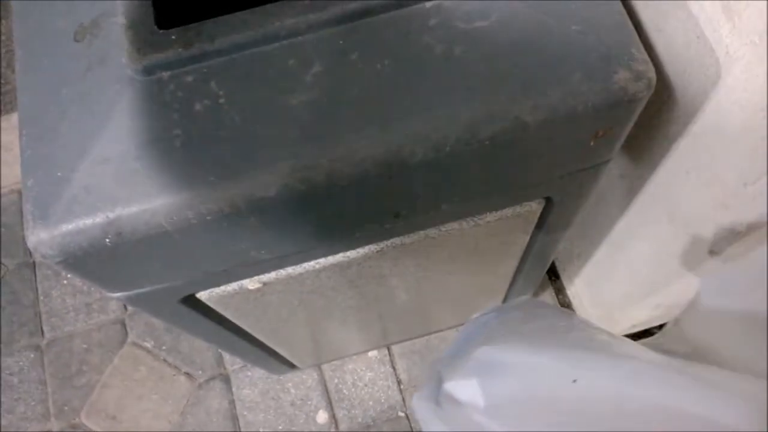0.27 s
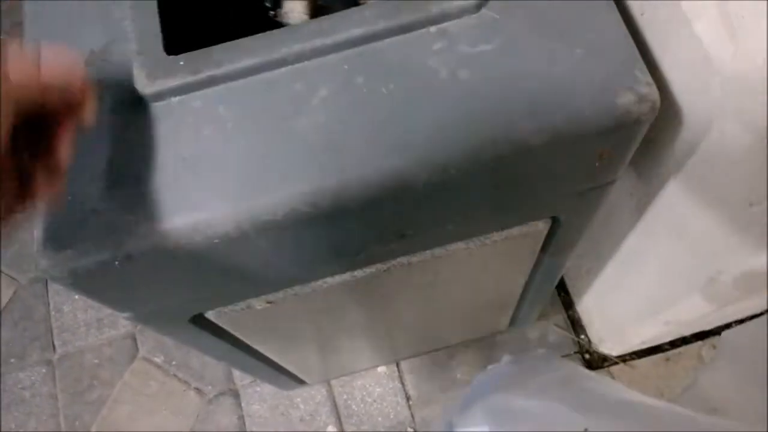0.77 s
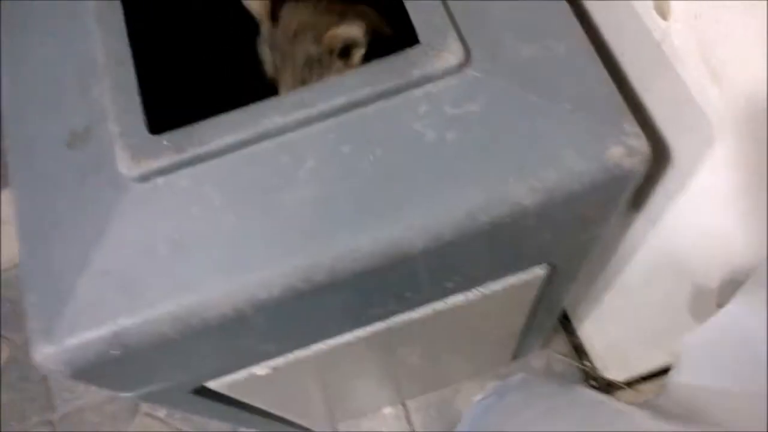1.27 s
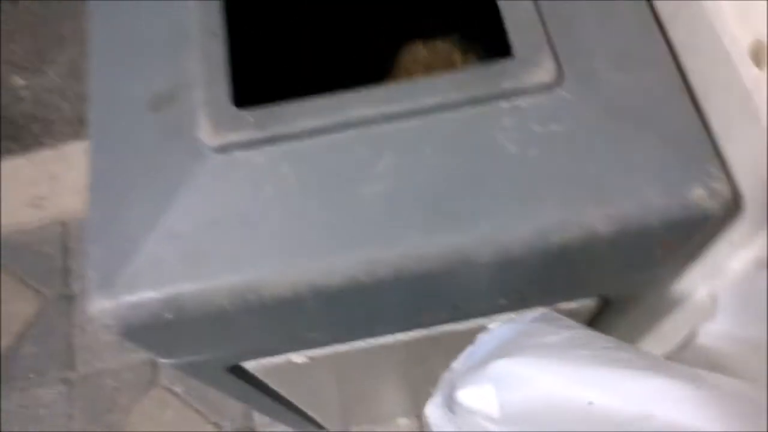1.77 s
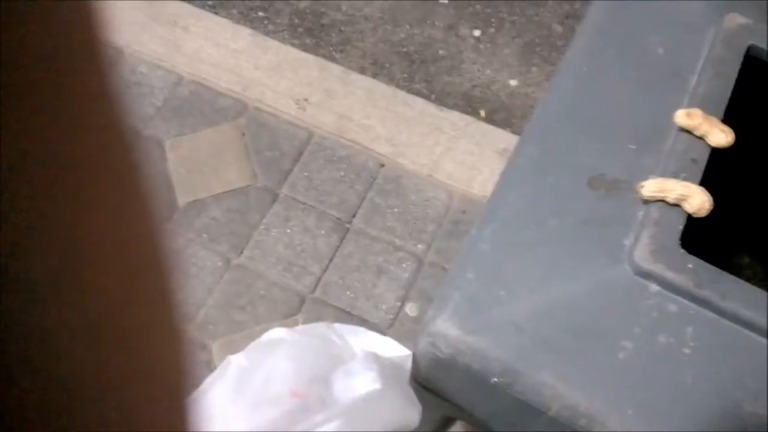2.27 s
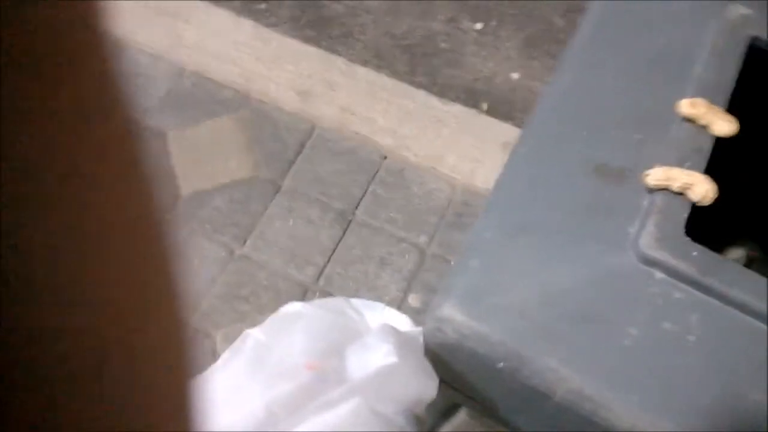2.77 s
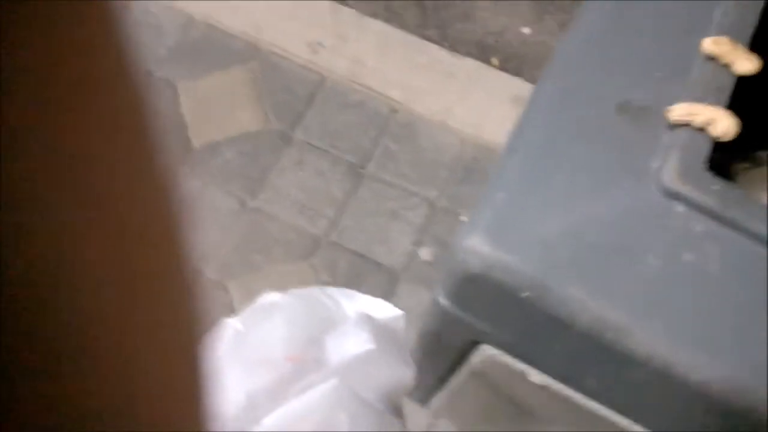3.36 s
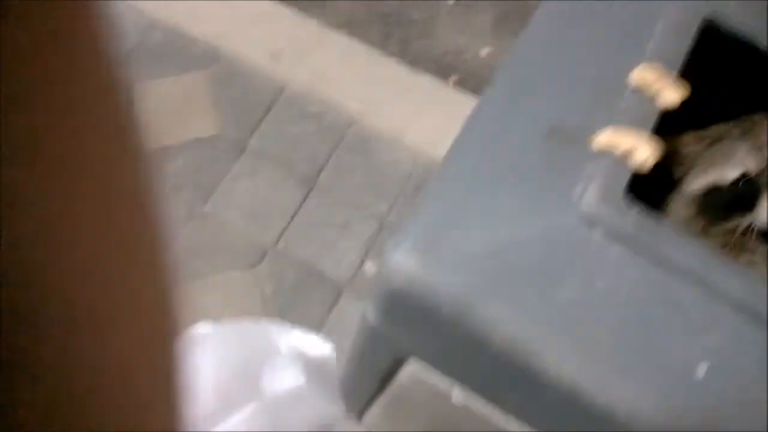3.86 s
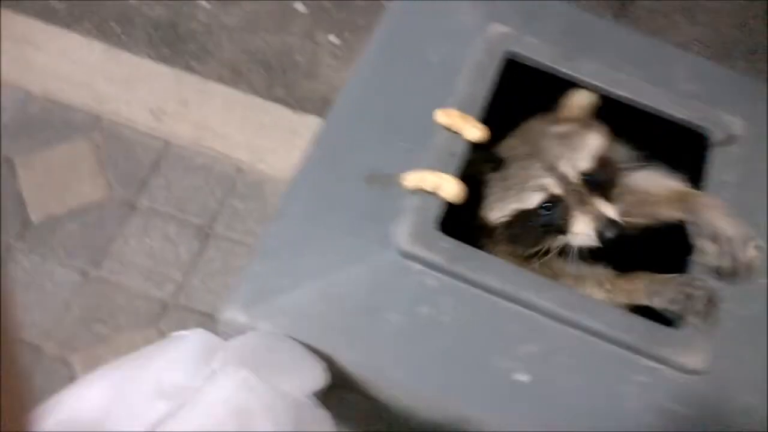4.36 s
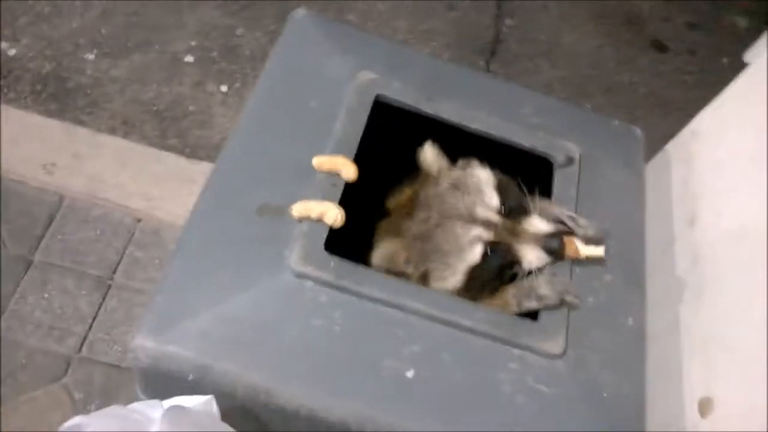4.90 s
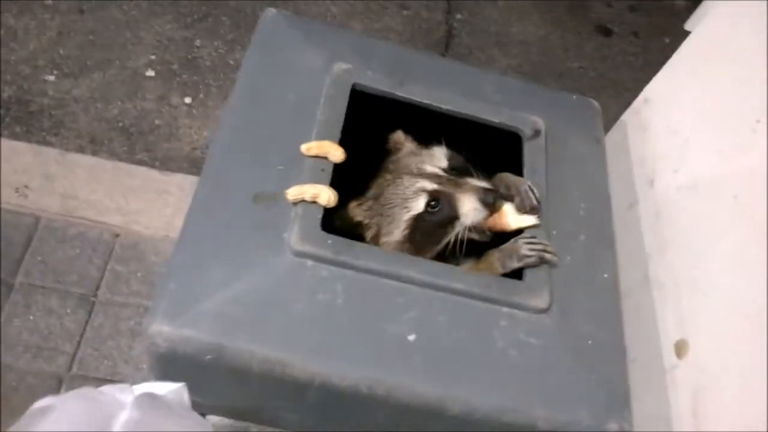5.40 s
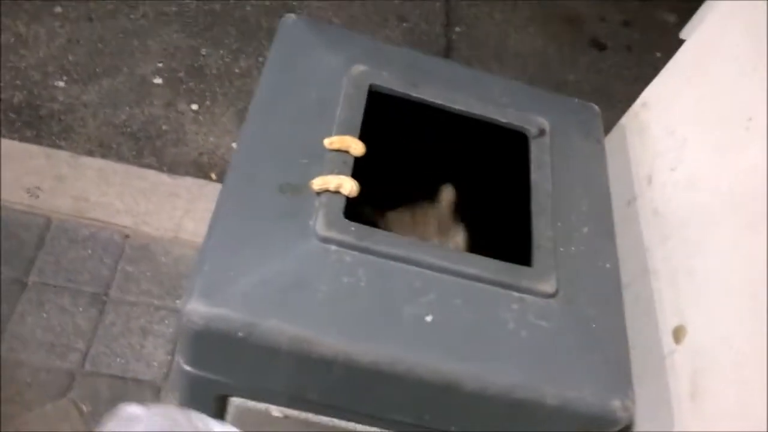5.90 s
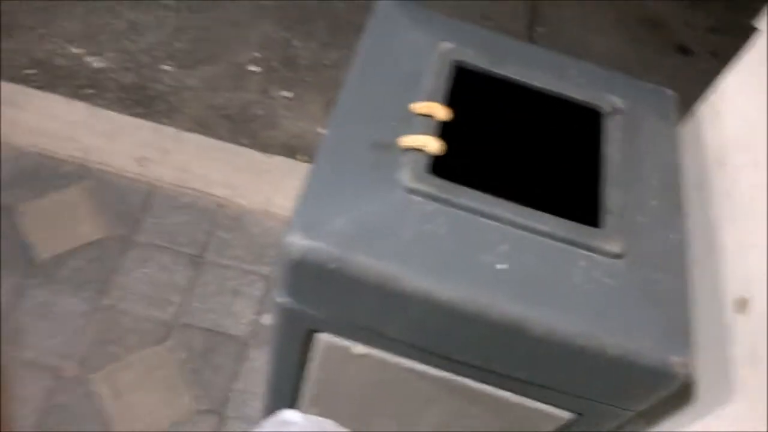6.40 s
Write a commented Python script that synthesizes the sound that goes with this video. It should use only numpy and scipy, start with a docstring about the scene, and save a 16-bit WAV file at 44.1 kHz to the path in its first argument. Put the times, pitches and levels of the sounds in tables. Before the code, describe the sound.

A low, wavering traffic rumble runs throughout, outdoors and close to a phone microphone. After faint bag rustle and a few dry clicks, a sharp burst of crackling plastic and bright snaps comes before two seconds. Dull shuffling follows inside a bin, then a raccoon's paws knock rapidly on hollow plastic walls with claw scrapes and crinkling just after four seconds. One more double thump, then sparse rustles and small clicks.

```python
"""A plastic street bin in town: a raccoon clambers about in it and reaches for peanuts, a step from a phone.
Paws thump as banks of decaying wall modes; claws drag on the walls as random slips through those modes.
Dry clicks are short pitched snaps, some close to the phone; scratches are runs of tiny snaps.
Thin bags crinkle as coloured grains and hiss, with brief hoarse notes of noise around one broad pitch;
the town is shaped noise with a wavering low drone."""
import sys
import numpy as np
from scipy import signal
from scipy.fft import rfft, irfft, next_fast_len
from scipy.io import wavfile
from scipy.ndimage import uniform_filter1d

SR = 44100
rng = np.random.default_rng(int(sys.argv[2]) if len(sys.argv) > 2 else 0)


def master(y):
    """Save y as 16-bit WAV."""
    cut = np.clip(np.atleast_2d(y).T, -1, 1)
    pcm = np.round(cut * 32767)  # scale
    wavfile.write(sys.argv[1], SR, pcm.astype(np.int16))


N = 292710
T = np.arange(N) / SR  # time in seconds


def undb(db):
    """Decibels to gain."""
    return 10 ** (np.asarray(db) / 20)


def unit(x):
    """Scale to rms 1."""
    return x / np.sqrt(np.mean(x ** 2))


def curve(table):
    """Gain over time from rows of seconds and dB."""
    return undb(np.interp(T, *np.transpose(table)))


def colour(x, points):
    """Give x a spectrum drawn through (Hz, dB) points, at rms 1."""
    hz, db = np.transpose(points)
    size = next_fast_len(N, real=True)
    f = np.arange(size // 2 + 1) * SR / size
    gain = undb(np.interp(np.log(f + 1), np.log(hz), db))
    return unit(irfft(rfft(x, size) * gain, size)[:N])


def filt(x, hz, kind, order=2):
    """Butterworth filter with edges kept in range."""
    edges = np.clip(hz, 10, .47 * SR)
    return signal.sosfilt(signal.butter(order, edges, kind, fs=SR, output="sos"), x)


def walk(rate):
    """Smooth random wander, rms 1, with about `rate` new targets a second."""
    hold = max(int(SR / rate), 2)
    steps = rng.standard_normal(N)[np.arange(N) // hold]
    return unit(uniform_filter1d(steps, hold))


def grains(rate, spread_db):
    """Random tiny snaps at rms 1; a positive spread makes a few stand out, a negative one makes a few faint."""
    happens = rng.random(N) < rate / SR
    strength = undb(spread_db * np.minimum(rng.exponential(size=N), 4))
    return unit(happens * rng.choice([-1, 1], N) * strength)


def add(out, start, sound):
    """Mix a sound in at a time in seconds."""
    i = max(int(start * SR), 0)
    out[i:i + len(sound)] += sound[:N - i]


def stroke(t, length, attack_s, release_s, arch_db):
    """Envelope of one movement, t seconds after its start: it sets in, arches up half-way and dies off."""
    out, live = np.zeros(len(t)), (t > 0) & (t < length + 10 * release_s)
    t = t[live]
    progress = np.clip(t / length, 0, 1)
    attack = np.clip(t / attack_s, 0, 1)
    release = np.exp(-np.maximum(t - length, 0) / release_s)
    out[live] = attack * release * undb(-arch_db * (2 * progress - 1) ** 2)
    return out


# Distant town rumble. Each row: time in seconds, level in dB before the swells.
RUMBLE_LEVEL = [(0, -43), (.4, -45), (1.05, -43.5), (1.5, -47), (2.15, -44.5), (2.55, -40.5), (4.4, -41.5),
                (5.1, -40.5), (5.8, -44.5), (6.64, -44.5)]
# Far tyres, louder by the middle and then holding. Each row: time in seconds, level in dB.
TYRE_LEVEL = [(0, -71.5), (2.3, -67), (2.8, -62), (5.5, -61), (6.64, -63)]
# Spectra of the rumble, the wash and the tyres. Each row: frequency in Hz, relative density in dB per Hz.
RUMBLE_COLOUR = [(15, -24), (25, -5), (45, -4), (63, 0.5), (80, -3), (120, -5), (160, -7), (220, -16.5),
                 (320, -26.5), (600, -56.5)]
WASH_COLOUR = [(100, -10), (250, 1.5), (450, -3), (600, -5.5), (740, -7), (1000, -12.5), (1300, -22.5),
               (2000, -57), (4000, -44), (8000, -75), (12000, -74), (16000, -43)]
TYRE_COLOUR = [(400, 16.5), (800, 17), (1400, 9), (2000, 5), (3000, -7.5), (6000, -13)]


def town(swell_db=2.1, wash_db=-56, wash_sway_db=1.3, drone_hz=64, drone_db=-53):
    """Swelling rumble of far traffic with a wavering drone, a softer wash, and tyres that draw nearer."""
    rumble = colour(rng.standard_normal(N), RUMBLE_COLOUR) * curve(RUMBLE_LEVEL) * undb(swell_db * walk(11))
    drone_pitch = drone_hz * (1 + 0.0391 * walk(6.5))
    drone = np.sin(2 * np.pi * np.cumsum(drone_pitch) / SR) * undb(walk(3.6))
    wash = colour(rng.standard_normal(N), WASH_COLOUR) * undb(wash_sway_db * walk(2.28))
    tyres = colour(rng.standard_normal(N), TYRE_COLOUR) * curve(TYRE_LEVEL)
    return rumble + undb(drone_db) * unit(drone) + undb(wash_db) * wash + tyres


# Strokes of crinkling and brushing in thin plastic, by hand or paw. Each row: start in seconds,
# length in seconds, treble level in dB before trim and flutter, body of the rustle in dB relative to the treble.
RUSTLES = [(0.403, 0.055, -65.5, -2), (0.514, 0.33, -73, 4), (1.063, 0.44, -71, 3.5),
           (1.534, 0.025, -57.5, -2), (1.561, 0.067, -47.5, -1), (1.677, 0.052, -42.5, -8.5),
           (1.707, 0.093, -46.5, -2.5), (1.822, 0.084, -52, 1.5), (1.89, 0.27, -55, -0.5),
           (1.999, 0.14, -45.5, -2.5), (2.146, 0.26, -67, 4), (2.523, 0.25, -72, -1), (2.9, 0.36, -70, 5),
           (3.217, .04, -62.5, 2), (3.322, 0.086, -64, -4), (3.554, 0.073, -53, -4.5),
           (3.623, 0.18, -55.5, -3), (3.79, 0.11, -55, 0), (3.853, 0.38, -57.5, 3),
           (4.091, 0.021, -58, 8.5), (4.105, 0.21, -50.5, 0.5), (4.287, 0.13, -43.5, 2),
           (4.32, 0.18, -43.5, -4.5), (4.481, 0.077, -47.5, -2), (4.54, 0.09, -52.5, 0),
           (4.598, 0.19, -56, -4), (4.712, 0.14, -69, 11), (4.931, 0.1, -58, -0.5), (5.031, 0.16, -65, 0.5),
           (5.347, 0.18, -71.5, -1), (5.687, 0.31, -67.5, -1), (5.908, 0.03, -57, -4),
           (5.896, 0.38, -56.5, -4), (6.094, .14, -67, -6), (6.305, 0.12, -61, -3.5),
           (6.526, 0.11, -65.5, 0)]
# Spectra of the crisp film and of the rustle's body. Each row: frequency in Hz, relative density in dB per Hz.
FILM_COLOUR = [(1500, -11), (3500, -5.5), (5500, 2), (8000, 4), (11500, 7), (14000, 1), (16000, -10)]
BODY_COLOUR = [(150, 2), (400, -15), (900, 4), (1800, 5.5), (3300, 4.5), (5000, 3), (9000, -7)]
ATTACK_SHARE, RELEASE_SHARE = 0.23, 0.07  # of a stroke's length
FIDGET_DB = -76  # faint stirring between strokes, before trim and flutter


def rustle(film_db=-1, body_db=-2.0, shimmer_db=2.0, flutter_db=1.0, crease_db=-7, hiss_db=-7):
    """Thin plastic buckles in dense little snaps and a few coarser creases over a brushing hiss."""
    motion = rubbing = undb(FIDGET_DB)
    for start, length, db, firm_db in RUSTLES:
        attack_s, release_s = ATTACK_SHARE * length, RELEASE_SHARE * length
        push = undb(db) * stroke(T - start, length, attack_s, release_s, arch_db=2)
        motion = np.hypot(motion, push)
        rubbing = np.hypot(rubbing, undb(firm_db) * push)  # firmer rubbing brings out the middle
    film_snaps = grains(rate=2000, spread_db=-5.0) + undb(hiss_db) * rng.standard_normal(N)
    creases = colour(grains(rate=190, spread_db=-1.5), FILM_COLOUR)
    film = colour(film_snaps, FILM_COLOUR) + undb(crease_db) * creases
    body_snaps = grains(rate=1400, spread_db=-2.0) + undb(hiss_db) * rng.standard_normal(N)
    body = colour(body_snaps, BODY_COLOUR) * undb(shimmer_db * walk(40))
    crinkle = undb(film_db) * motion * film + undb(body_db) * rubbing * body
    return undb(flutter_db * walk(110)) * crinkle


# Dry short clicks, some close to the phone. Each row: start in seconds, ring level in dB before trim,
# pitch in Hz, crack in dB relative to the ring.
CLICKS = [(.064, -60.5, 11600, 2), (0.6936, -33, 11700, -27), (.7001, -35.5, 8100, -11.5),
          (1.087, -37.5, 11200, -5.5), (1.091, -38, 8000, -9), (1.3206, -34.5, 3840, -10.5),
          (1.4286, -48, 10000, -5), (1.453, -43, 3340, -4), (1.519, -52, 9000, -6), (1.6076, -36, 9500, -3),
          (1.6257, -38, 7400, 1), (1.6265, -39, 9000, 0), (1.6512, -26, 7500, -19),
          (1.6535, -29, 7550, -23), (1.655, -29, 7400, -10), (1.664, -14, 8440, -27),
          (1.7062, -25, 11600, -14), (1.748, -31, 7500, -17), (1.7902, -28, 2900, -7),
          (1.7966, -31, 2980, -4), (1.821, -37, 7000, -12), (1.838, -26, 2550, -16),
          (1.8442, -36, 2900, -12), (1.889, -43, 1940, 2), (2.152, -38.5, 8200, -7.5),
          (2.6745, -46.5, 3450, -3), (3.155, -47, 3360, -10), (3.7155, -41, 4250, -7.5),
          (3.7315, -37.5, 5000, -3), (3.877, -40, 8500, -3.5), (3.993, -44, 6300, -9),
          (3.959, -31.5, 7460, -9), (3.966, -34, 7440, -10), (4.0086, -31.5, 6730, -7),
          (4.083, -36, 5200, -22), (4.2342, -32, 1980, -13), (4.257, -40, 9100, 1),
          (4.4848, -17, 10000, -17), (4.485, -27.5, 2650, -5.5), (4.492, -36, 9500, -9),
          (4.7547, -33, 2070, 1), (4.783, -37.5, 1970, -3.5), (6.0383, -34, 7900, -15),
          (6.5036, -38, 11500, -6.5), (6.512, -48, 11000, -5)]
# A harder snap is over sooner: decay time at a reference level, and the extra dB that halve it.
SNAP_DECAY_S, SNAP_REF_DB, SNAP_HALVING_DB = 0.0005, -23.5, 19.5


def clicks(gain_db=1, edge_db=-1, crack_stretch=3, tail_db=-40, tail_s=0.024):
    """A snap is a sharp first swing, a few cycles of one pitch, a broad crack and a faint scatter off bin and wall."""
    out, t = np.zeros(N), T[:SR // 12]
    for start, db, hz, crack_db in CLICKS:
        fade = t / (SNAP_DECAY_S * 2 ** ((SNAP_REF_DB - db) / SNAP_HALVING_DB))
        envelope = np.exp(-fade) + undb(edge_db) * np.exp(-2 * hz * t)  # second part: the sharp first swing
        ring = envelope * np.sin(2 * np.pi * hz * t)
        grit = unit(filt(rng.standard_normal(len(t)), [hz / 2, min(2 * hz, 15000)], "bandpass", order=1))
        snap = ring + undb(crack_db) * grit * np.exp(-fade / crack_stretch)
        echoes = rng.standard_normal(len(t)) * np.exp(-t / tail_s)
        scatter = signal.fftconvolve(snap, echoes)[:len(t)]
        add(out, start, undb(db + gain_db) * (snap + undb(tail_db) * scatter))
    return out


# Short claw scratches. Each row: start in seconds, length in seconds, centre in Hz, level in dB.
SCRATCHES = [(1.692, 0.0097, 9500, -41), (1.76, 0.013, 8000, -47), (1.781, .012, 3130, -45.5),
             (1.8403, 0.008, 2800, -37), (2.588, 0.0087, 6600, -55.5), (2.681, 0.0066, 2980, -54),
             (2.718, 0.009, 8900, -43), (2.947, 0.014, 7000, -56), (3.223, 0.012, 2200, -56.5),
             (3.591, .012, 3040, -44), (3.6, 0.0087, 5000, -46.5), (3.712, 0.0058, 4960, -42.5),
             (3.729, 0.004, 6000, -44), (3.848, .008, 9000, -48), (4.095, 0.0077, 6800, -39.5),
             (4.134, 0.008, 6260, -42), (4.486, 0.0054, 9500, -40), (5.361, 0.011, 7000, -65),
             (6.028, 0.0066, 2400, -46), (6.082, 0.007, 9050, -45.5)]


def scratches(width_octaves=1.67):
    """A claw catches many times within a few milliseconds: a quick run of tiny snaps in one band."""
    out, t, half = np.zeros(N), T[:SR // 8], 2 ** (width_octaves / 2)
    catches = grains(rate=3000, spread_db=3.5)
    for start, length, hz, db in SCRATCHES:
        run = catches[int(start * SR):][:len(t)]
        rasp = unit(filt(run, [hz / half, min(hz * half, 15000)], "bandpass", order=1))
        add(out, start, undb(db) * rasp * stroke(t, length, attack_s=0.001, release_s=0.012, arch_db=4))
    return out


# Brief hoarse notes in the rustle. Each row: start in seconds, length in seconds, note in Hz,
# rise in octaves, level in dB.
HOARSE_NOTES = [(1.698, 0.034, 3960, -0.09, -41.5), (1.855, 0.041, 2410, -0.33, -49.5),
                (4.317, 0.04, 2220, -0.3, -48), (4.336, 0.043, 1211, 0.066, -42),
                (4.946, 0.055, 1490, 0.11, -54.5), (5.045, 0.066, 2440, 0.036, -66.5)]


def hoarse_notes(width_octaves=0.47):
    """Fine noise around one broad pitch that slides a little."""
    out, t = np.zeros(N), T[:SR // 4]
    for start, length, hz, rise, db in HOARSE_NOTES:
        note = hz * 2 ** (rise * np.clip(t / length, 0, 1))
        noise = filt(rng.standard_normal(len(t)), hz * (2 ** (width_octaves / 2) - 1), "lowpass")
        rasp = unit(noise * np.sin(2 * np.pi * np.cumsum(note) / SR))  # noise carried up to the note
        add(out, start, undb(db) * rasp * stroke(t, length, attack_s=0.0063, release_s=0.0099, arch_db=2.5))
    return out


# Modes of the bin's walls. Each row: frequency in Hz before flexing, relative level in dB,
# time to fall by 60 dB in seconds.
BIN_MODES = [(101.7, 5.5, 0.18), (173, -11, 0.21), (224, -8.5, 0.12), (262, -5, 0.17), (343.6, -3.5, 0.056),
             (403, -1.5, 0.073), (459.7, -5, 0.16), (526, -4.5, 0.087), (580, -6, 0.086), (737, -3, 0.042),
             (785, -6.5, 0.06), (835, -4, 0.11), (901, 0.5, 0.041), (1046, -11.5, 0.11), (1120, -8, 0.06),
             (1304, -20, 0.1), (1430, -16, 0.14), (1760, -8, 0.06), (1980, -3, 0.036), (2840, -1, 0.044)]
TRAVEL_S = 0.0024  # time the lowest note takes to cross the wall; bending waves run faster at higher pitch
BEND_SHARE, BEND_S = 0.026, 0.021  # a blow presses the wall's notes down; they rise as it springs back


def bin_ring(weights):
    """The bin's answer to one tap; the weights depend on where it is touched, and the low notes arrive last."""
    out = np.zeros(SR // 3)
    flex = 1 + 0.004 * rng.standard_normal(len(BIN_MODES))  # the animal's weight shifts the walls' notes
    for weight, shift, (hz, db, t60) in zip(weights, flex, BIN_MODES):
        delay = TRAVEL_S * np.sqrt(BIN_MODES[0][0] / hz)
        t = np.maximum(T[:len(out)] - delay, 0)
        bent = t - BEND_SHARE * BEND_S * (1 - np.exp(-t / BEND_S))
        decay = np.exp(-np.log(1000) * t / t60)
        out += weight * undb(db) * decay * np.sin(2 * np.pi * hz * shift * bent)
    return out


# Dull shifts of the body inside the bin. Each row: start in seconds, length in seconds, level in dB before trim.
SHUFFLES = [(2.145, 0.38, -44), (2.512, 0.58, -48), (3.143, 0.19, -45.5), (3.496, 0.36, -45.5),
            (3.843, 0.32, -46.5), (4.07, 0.42, -42), (4.78, 0.23, -48)]
# Spectrum of those shifts. Each row: frequency in Hz, relative density in dB per Hz.
SHUFFLE_COLOUR = [(30, -21), (90, 1), (150, 9.5), (210, 6), (330, 4), (480, -3), (800, -34)]
# Claws dragging on the wall. Each row: start in seconds, length in seconds, level in dB before trim.
DRAGS = [(3.592, 0.023, -69), (3.987, 0.21, -49.5), (4.158, 0.027, -36.5), (4.253, 0.064, -50),
         (4.39, 0.046, -43), (4.466, .11, -47.5), (4.808, 0.044, -52)]


def scrabble(drag_db=-2, shuffle_db=-1, press_s=0.05):
    """Claws stick and slip on the wall, each slip ringing it, while the body shifts in the rubbish."""
    slips = grains(rate=450, spread_db=0.0)
    ring = bin_ring(rng.choice([-1, 1], len(BIN_MODES)))
    ring = ring * np.exp(-T[:len(ring)] / press_s)  # the pressing paw damps the wall
    wall = unit(filt(signal.fftconvolve(slips, ring)[:N], [280, 1500], "bandpass"))
    shuffle = colour(grains(rate=370, spread_db=-0.5), SHUFFLE_COLOUR)
    dragging, shifting = np.zeros(N), np.zeros(N)
    for start, length, db in DRAGS:
        dragging += undb(db) * stroke(T - start, length, attack_s=0.0054, release_s=0.031, arch_db=6)
    for start, length, db in SHUFFLES:
        shifting += undb(db) * stroke(T - start, length, attack_s=0.025, release_s=0.11, arch_db=7.5)
    return undb(drag_db) * dragging * wall + undb(shuffle_db) * shifting * shuffle


# Paws and body against the bin. Each row: start in seconds, peak in dB before trim, note of the struck panel in Hz,
# lift of that panel in dB, following weight in dB relative to the blow before trim.
KNOCKS = [(2.7213, -27.5, 233.8, 47, 0.5), (2.973, -41, 262, 20, -10), (3.228, -35, 720, 7, -8),
          (3.597, -32.5, 980, 21, 6.5), (4.096, -27, 232, 2, -2.5), (4.135, -26, 364, 7, -4),
          (4.157, -24, 766, 9, -15), (4.166, -22.5, 730, 15, -6), (4.175, -28, 416, 13, -1),
          (4.194, -33, 420, 11, 2), (4.208, -35, 400, 10, -8), (4.2339, -18, 365, 19, -19),
          (4.25, -27, 800, 5, -8), (4.297, -35, 308, 2, -15), (4.329, -25.5, 424, 12, -11),
          (4.351, -16, 756, 18.5, -17), (4.357, -20.5, 260, 23, -1), (4.3608, -20, 890, 17, -21),
          (4.376, -31, 470, 1, -6), (4.421, -27, 1075, 12, -14), (4.483, -27, 460, -5, -10),
          (4.7548, -19, 335, 17.5, -1), (4.761, -23, 255.6, 21.5, -8), (4.782, -27, 894, 20, 2),
          (4.819, -39, 260, 2, -4), (5.353, -49, 850, 6, -15)]
WALL_LOW_HZ = 62  # the walls give off little below this
PAW_EDGE_HZ = 1250  # upper edge of a padded blow
WEIGHT_LAG_S, WEIGHT_EDGE_HZ = 0.0153, 190  # the body's weight lands just after the paw and flexes the whole wall


def knocks(gain_db=1, weight_db=-3, panel_octaves=0.094, rattle_db=-33, rattle_s=0.044):
    """Padded blows ring the walls, the struck panel most; the lid rattles briefly and the body's weight follows."""
    out, t = np.zeros(N), T[:SR // 3]
    mode_hz = np.array(BIN_MODES)[:, 0]
    for start, db, panel_hz, lift_db, follow_db in KNOCKS:
        nearness = np.exp(-(np.log2(mode_hz / panel_hz) / panel_octaves) ** 2)
        ring = bin_ring(undb(lift_db * nearness))
        rattle = unit(filt(rng.standard_normal(len(t)), [200, 2200], "bandpass")) * np.exp(-t / rattle_s)
        struck = ring / np.abs(ring).max() + undb(rattle_db) * rattle
        blow = filt(struck, PAW_EDGE_HZ, "lowpass")  # a soft paw spares the high modes
        boom = filt(bin_ring(np.ones(len(BIN_MODES))), WEIGHT_EDGE_HZ, "lowpass")
        add(out, start, undb(db + gain_db) * blow / np.abs(blow).max())
        add(out, start + WEIGHT_LAG_S, undb(db + follow_db + weight_db) * boom / np.abs(boom).max())
    return filt(out, WALL_LOW_HZ, "highpass")


def scene():
    """Everything at one microphone."""
    return (town() + rustle() + clicks() + scratches() + hoarse_notes() + scrabble() + knocks())[None]


def record(dry, top_hz=15800):
    """The phone cuts the top with a steep elliptic low-pass."""
    return signal.sosfilt(signal.ellip(10, .2, 70, top_hz, fs=SR, output="sos"), dry)


dry = scene()
out = record(dry)
master(out)
```